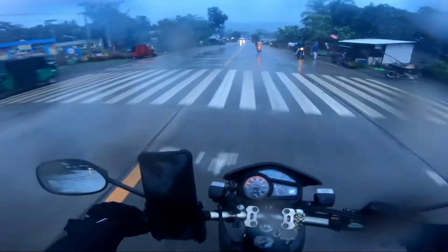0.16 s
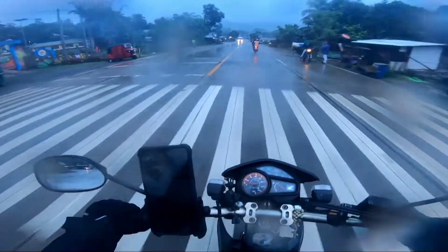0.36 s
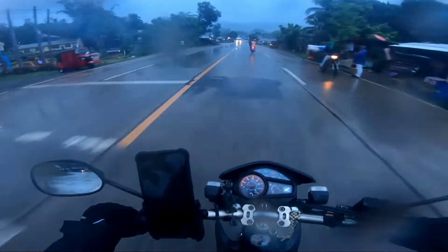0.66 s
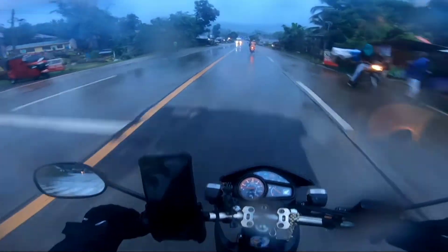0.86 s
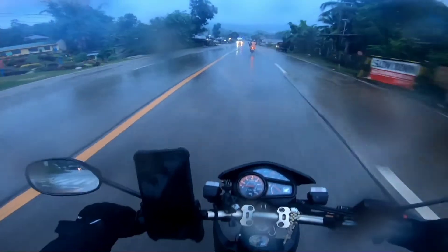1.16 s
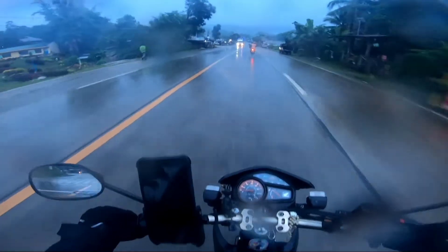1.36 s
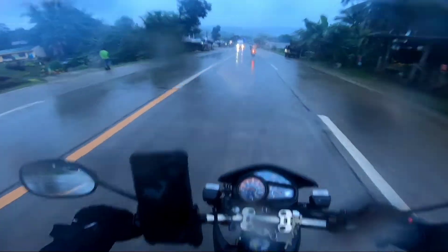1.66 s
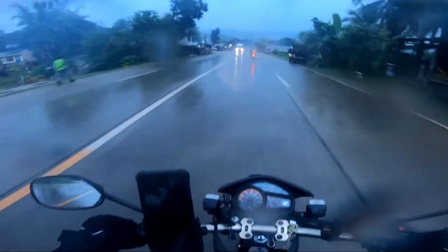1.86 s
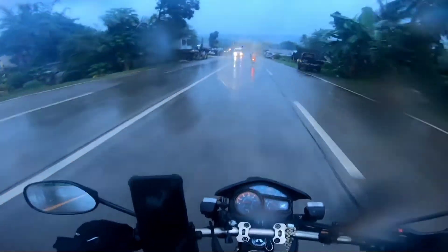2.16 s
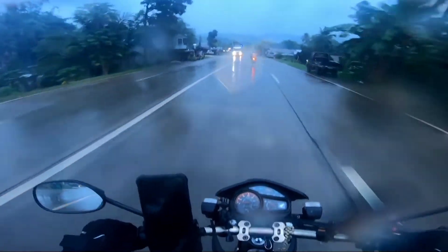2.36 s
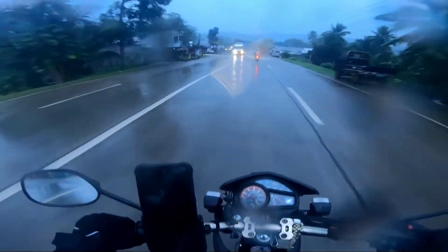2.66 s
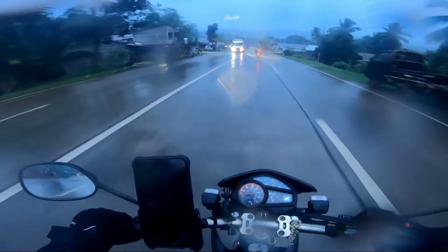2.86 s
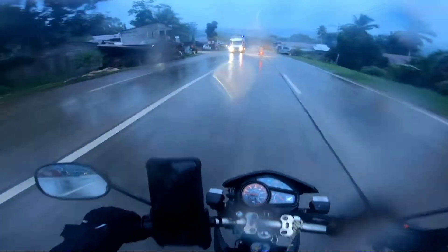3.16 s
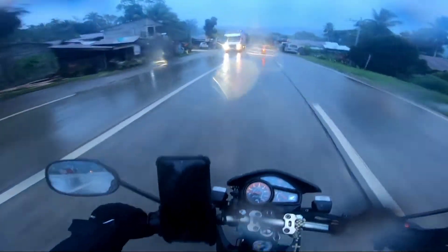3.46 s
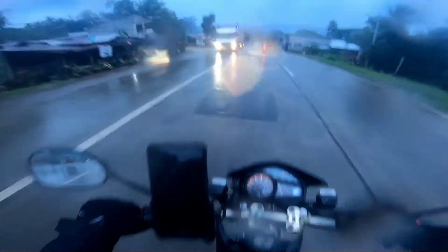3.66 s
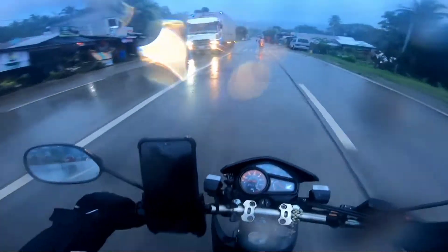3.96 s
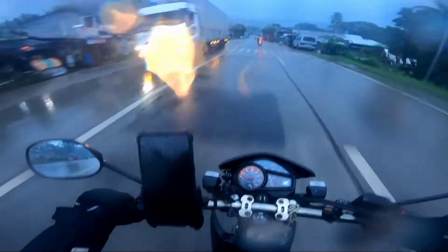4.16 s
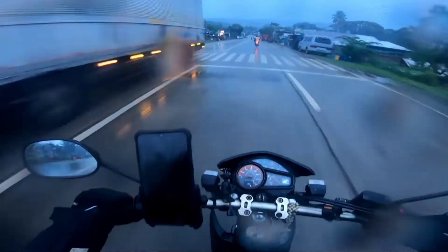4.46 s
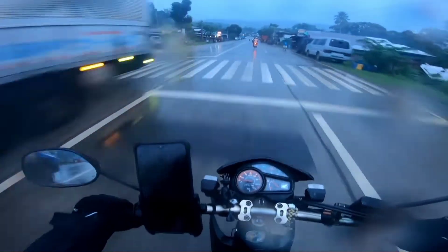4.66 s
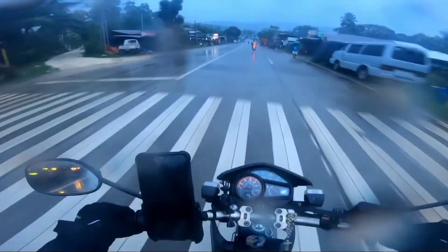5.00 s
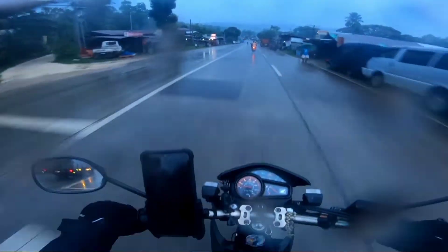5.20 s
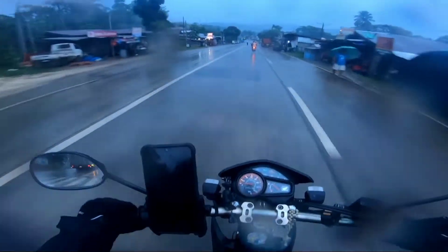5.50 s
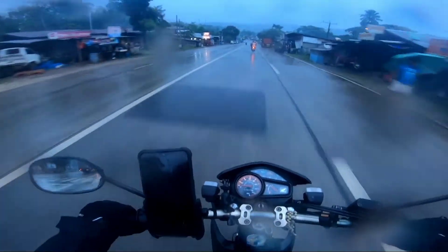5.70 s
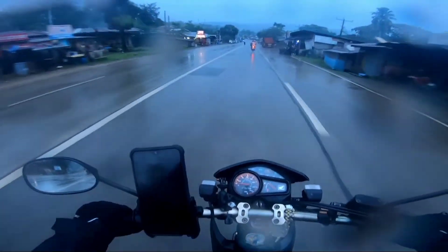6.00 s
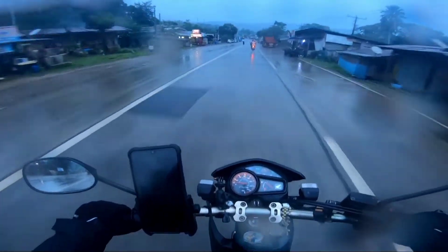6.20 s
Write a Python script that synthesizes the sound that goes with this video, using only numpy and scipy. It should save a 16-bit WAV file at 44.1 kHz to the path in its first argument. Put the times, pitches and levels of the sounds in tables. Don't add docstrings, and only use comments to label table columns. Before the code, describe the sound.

A microphone inside a motorcycle helmet catches a single-cylinder engine throbbing low and rising slightly in pitch. Deep wind buffets, gusty thumps and broad roar surround it, with bright tyre spray, ticking raindrops and small plastic rattles. Hiss thickens on wetter road near the middle, then an oncoming lorry swishes past and the ride continues. Sound sits in the left channel; the right has only very faint hiss.

```python
import sys
import numpy as np
from scipy import signal
from scipy.fft import rfft, irfft
from scipy.io import wavfile
from scipy.ndimage import uniform_filter1d

SR = 44100
rng = np.random.default_rng(int(sys.argv[2]) if len(sys.argv) > 2 else 0)


def transcribe(signal):
    frames = np.atleast_2d(signal).T
    limited = np.clip(frames, -1, 1)
    pcm = np.round(limited * 32767).astype(np.int16)
    wavfile.write(sys.argv[1], SR, pcm)


def invert_db(level):
    return 10 ** (np.asarray(level, dtype=float) / 20)


N = 279594
T = np.arange(N) / SR
F = np.maximum(np.fft.rfftfreq(N, 1 / SR), .1)

# time_s, firing_rate_hz
SPEED = [(0, 33.2), (.7, 34.3), (1.45, 35.45), (2.2, 36.35), (2.95, 37.3), (3.3, 37.7), (3.52, 37.9),
         (3.7, 38.4), (4.0, 38.55), (4.45, 39.15), (5.2, 39.7), (6.34, 40.3)]


def level(x, db):
    return x * invert_db(db) / np.sqrt(np.mean(x ** 2))


def curve(table):
    s, value = np.transpose(table)
    return np.interp(T, s, value)


def walk(rate):
    k = max(int(SR / rate), 2)
    steps = np.repeat(rng.standard_normal(300), k)[:N]
    w = uniform_filter1d(uniform_filter1d(steps, k), k)
    return w / w.std()


def filtered_noise(response):
    return irfft(rfft(rng.standard_normal(N)) * response, N)


def noise(spectrum, shared_db, own_db, rate, count):
    hz, db = np.transpose(spectrum)
    colour = invert_db(np.interp(np.log(F), np.log(hz), db, left=-90, right=-90))
    shaped = rfft(rng.standard_normal(N)) * colour
    place = (count - 1) * np.log(F / hz[0]) / np.log(hz[-1] / hz[0])
    total = np.zeros(N)
    for k in range(count):
        share = np.clip(1 - abs(place - k), 0, 1)
        total += irfft(shaped * share, N) * invert_db(own_db * walk(rate))
    return level(total * invert_db(shared_db * walk(rate)), 0)


def resonance(hz, width):
    return 1 / (1 + 1j * (F - hz ** 2 / F) / width)


def add(out, s, grain):
    i = int(s * SR)
    out[i:i + len(grain)] += grain[:N - i]


def bump(s, half, db):
    return db * np.exp(-((T - s) / half) ** 2)


def swells(table, lull_db):
    power = invert_db(lull_db) ** 2
    for s, db, half in table:
        power = power + invert_db(bump_db := db) ** 2 * np.exp(-2 * ((T - s) / half) ** 2)
    return np.sqrt(power)


def follow(mean_db, per_wind_db, per_firing_hz):
    # time_s, level_db
    airflow = [(0, -34), (.45, -32), (.75, -31.5), (1.05, -35.5), (1.6, -34.5), (2.05, -33), (2.4, -34.5),
               (2.9, -34.5), (3.3, -31.5), (3.75, -38), (4.2, -29), (4.65, -34), (5.2, -30.5), (5.5, -30),
               (5.85, -33.5), (6.34, -30.5)]
    wind_db, rate = curve(airflow), curve(SPEED)
    return mean_db + per_wind_db * (wind_db - wind_db.mean()) + per_firing_hz * (rate - rate.mean())


def engine():
    # time_s, level_db
    throttle = [
        (0, 1.5),
        (.3, -1),
        (1, -5),
        (1.7, -3),
        (2.3, -3.5),
        (3, -1.5),
        (3.5, -3),
        (4, -5.5),
        (5.3, -5),
        (6.34, -7.5),
    ]
    rate = curve(SPEED)
    cycles = np.cumsum(rate) / SR
    chance = rng.standard_normal((300, 2))
    driven = exhaust(cycles, chance) + exhaust_gas(cycles) + chain(cycles) + gear_whine(cycles, rate)
    return invert_db(curve(throttle)) * driven + crank(cycles) + intake(cycles, invert_db(.8 * chance[:, 0]))


def exhaust(cycles, chance):
    # pitch_hz, width_hz, level_db, lag_ms after the firing
    pipe_rings = [(115.7, 74, -1.5, 0.79), (149.5, 55, 0, 13.34), (237.8, 101, 5.5, 5.976),
                  (334.5, 99, -0.5, 18), (443, 51, -4.5, 9.85), (576, 45, -16, 20.5), (830, 13, -12, 3.52),
                  (1015, 140, -25, 15), (1360, 160, -18, 18.5), (1520, 210, -22, 6.6)]
    at = np.flatnonzero(np.diff(np.floor(cycles)) > 0)
    late = (.0001 * SR * chance[:len(at), 0]).astype(int)
    pulses = np.zeros(N)
    pulses[np.clip(at + late, 0, N - 1)] = invert_db(2.0 * chance[:len(at), 1])
    pipe = 0
    for hz, width, db, ms in pipe_rings:
        delay = np.exp(-2j * np.pi * F * ms / 1000)
        pipe = pipe + invert_db(db) * resonance(hz, width) ** 2 * delay
    pipe = pipe * (1 - .65 * resonance(395, 55))
    return level(irfft(rfft(pulses) * pipe, N), -22.2)


def exhaust_gas(cycles):
    return level(np.exp(-(cycles % 1) / .3) * filtered_noise(resonance(1200, 1500) ** 2), -40)


def chain(cycles):
    # multiple of the firing rate, level_db
    chain_tones = [(9.7, -34), (8.5, -40)]
    taut_db = bump(1.85, .6, 5)
    return sum(invert_db(db + taut_db + walk(4.3)) * np.sin(2 * np.pi * k * cycles) for k, db in chain_tones)


def gear_whine(cycles, rate):
    gear_tones = (((22, -35.5), (23, -33)), 826, 24)
    orders, hz, width = gear_tones
    whine = np.zeros(N)
    for k, db in orders:
        tone = np.sin(2 * np.pi * k * cycles + .3 * walk(8))
        whine += invert_db(db + .5 + 1.2 * walk(5)) * tone / (1 + ((k * rate - hz) / width) ** 2)
    comes_s, fades_s = 1.6, 3.95
    return whine / (1 + (T / fades_s) ** 12) / (1 + (comes_s / (T + .1)) ** 8)


def crank(cycles):
    # peak_s, level_db, half_length_s
    presses = [(.1, -12.5, 0.091), (.27, -16.5, 0.087), (.55, -21.5, .1), (.8, -20.5, 0.055),
               (1.2, -23.5, 0.17), (1.5, -26, 0.11), (1.81, -17, 0.035), (2.02, -20, .06),
               (2.43, -24, 0.11), (2.8, -20.5, 0.091), (3.0, -26, .06), (3.2, -21.5, 0.14),
               (3.56, -23, 0.08), (3.72, -28, 0.035), (3.97, -18, 0.095), (4.15, -24, 0.1),
               (4.32, -21.5, .08), (4.58, -25.5, 0.053), (4.82, -21, .05), (5.0, -19.5, 0.082),
               (5.3, -16.5, 0.046), (5.47, -22, 0.045), (6.0, -33, 0.076), (6.24, -27, .07)]
    return swells(presses, lull_db=-27.5) * invert_db(0.53 * walk(6.8)) * np.sin(4 * np.pi * cycles)


def intake(cycles, sizes):
    # time_s, level_db
    bark_level = [(0, -39), (.5, -37), (1.1, -39.5), (1.6, -37.5), (2.05, -34.5), (2.5, -37.5),
                  (3.2, -36.5), (3.7, -41), (4.2, -39), (4.8, -45), (6.34, -48)]
    # pitch_hz, width_hz, level_db
    box_rings = [(835, 70, 0), (1005, 130, 0)]
    gulp_at, gulp_lasts = .6, .2
    since = (cycles - gulp_at) % 1
    size = sizes[np.floor(cycles - gulp_at + 1).astype(int)]
    nearness = np.exp(-(np.minimum(since, 1 - since) / gulp_lasts) ** 2)
    puff = level(nearness * rng.standard_normal(N), 0)
    knock = level(1. * (np.diff(since, prepend=0) < 0), -3)
    box = sum(invert_db(db) * resonance(hz, width) for hz, width, db in box_rings) * resonance(930, 500)
    return invert_db(curve(bark_level)) * level(irfft(rfft(size * (puff + knock)) * box, N), 0)


def buffet():
    # time_s, level_db
    turbulence = [(0, -27), (.2, -14), (.7, -13), (1.2, -15.5), (1.6, -13), (1.85, -16), (2.1, -13.5),
                  (3.1, -14), (3.5, -12), (3.8, -18), (4.1, -13), (4.6, -12.5), (4.8, -20), (5.0, -14),
                  (5.4, -16), (5.65, -12), (6.0, -17), (6.34, -14)]
    # pitch_hz, level_db per Hz
    rumble = [(1.5, -10), (4, 0), (10, -1), (16, -4), (21, -11), (27, -30), (50, -55)]
    return invert_db(curve(turbulence)) * noise(rumble, shared_db=.4, own_db=.6, rate=3, count=3)


def heave():
    # peak_s, level_db, half_length_s
    shoves = [(.15, -21, .06), (.33, -15, 0.14), (.58, -17, 0.07), (.85, -17, 0.047), (1.25, -19, .05),
              (1.44, -16, 0.084), (1.75, -14, .04), (1.93, -21, 0.074), (2.1, -10, 0.034),
              (2.34, -14, 0.064), (2.48, -11.5, 0.059), (2.76, -22, 0.048), (2.95, -17, 0.1),
              (3.2, -20, .06), (3.35, -10, 0.067), (3.58, -23, 0.055), (3.76, -19, .05), (3.92, -15, 0.046),
              (4.1, -32, .05), (4.26, -11, 0.058), (4.45, -18, 0.075), (4.88, -17, 0.057),
              (5.06, -8, 0.045), (5.24, -15, 0.071), (5.45, -30, .08), (5.77, -15.5, 0.045),
              (5.93, -13, 0.047), (6.1, -15, 0.037), (6.25, -9.5, 0.082)]
    sway = signal.hilbert(filtered_noise(resonance(28.35, 15.7) ** 2))
    steady = np.real(sway / (abs(sway) + 0.14 * abs(sway).mean()))
    return swells(shoves, lull_db=-27) * steady


def thump():
    # peak_s, level_db, fall_s
    gusts = [(.09, -16.5, 0.27), (.33, -28, .04), (.46, -27, 0.08), (0.689, -24, 0.15), (1.1, -25.5, 0.077),
             (1.24, -24, 0.54), (1.55, -24, 0.24), (1.77, -23, 0.29), (2.03, -20, 0.037), (2.42, -27, 0.15),
             (2.61, -17.5, 0.03), (2.75, -13.5, 0.051), (2.98, -24, 0.35), (3.18, -24, 0.44),
             (3.65, -15.5, 0.051), (3.94, -18, 0.11), (4.15, -21, 0.27), (4.28, -24, 0.31),
             (4.9, -22, 0.19), (5.08, -15.5, 0.088), (5.27, -33, 0.035), (5.42, -18, 0.13),
             (5.54, -20, 0.029), (5.72, -37, 0.059), (5.95, -21.5, 0.2), (6.18, -20, 0.16), (6.32, -20, .1)]
    # pitch_hz, level_db per Hz
    thump_colour = [(14, -10), (22, -16.5), (31, -13.5), (48, -11.5), (75, -11), (105, -12.5), (140, -19),
                    (220, -19.5), (400, -71)]
    rise_s, lull_db = 0.031, -27
    power = invert_db(lull_db) ** 2
    for s, db, fall in gusts:
        shape = np.exp(-np.where(T < s, ((T - s) / rise_s) ** 2, (T - s) / fall))
        power = power + (invert_db(db) * shape) ** 2
    gain = np.sqrt(power) * invert_db(-0.25)
    return gain * noise(thump_colour, shared_db=1.0, own_db=1.5, rate=10, count=4)


def roar():
    # pitch_hz, level_db per Hz
    roar_colour = [(70, -19), (130, 4.5), (200, -2), (300, 3.5), (450, -3), (650, -14.5), (1000, -26)]
    slack_db = bump(4.13, .09, -4)
    gain = invert_db(follow(mean_db=-27, per_wind_db=0.92, per_firing_hz=-0.4) + slack_db)
    return gain * noise(roar_colour, shared_db=0.26, own_db=-0.5, rate=6.3, count=5)


def rush():
    # pitch_hz, level_db per Hz
    rush_colour = [(400, 5), (700, -7), (950, -0.5), (1200, -5.5), (1800, -3), (2400, -11.5), (3400, -27),
                   (5000, -29), (8000, -96)]
    stripes_db = bump(.2, .35, 1.5)
    gain = invert_db(follow(mean_db=-34.5, per_wind_db=0.79, per_firing_hz=-0.013) + stripes_db)
    return gain * noise(rush_colour, shared_db=0.0, own_db=1.5, rate=10, count=16)


def spray():
    # pitch_hz, level_db per Hz
    spray_colour = [(2000, -2), (3200, 6.5), (4600, -1), (6500, -2.5), (9000, -1), (11000, 0), (14000, -4),
                    (17000, -5)]
    puddles_db = bump(2.82, 0.84, 2.5)
    gain = invert_db(follow(mean_db=-44.5, per_wind_db=0.36, per_firing_hz=0.21) + puddles_db)
    return gain * noise(spray_colour, shared_db=.9, own_db=1.1, rate=22, count=16)


def drop(hz, low_db, decay_s, chance):
    t = np.arange(len(chance)) / SR
    splat = .75 * np.sin(2 * np.pi * hz * t) + 1.1 * chance
    tick = invert_db(low_db) * np.sin(2 * np.pi * 3600 * t)
    return 2 * t / decay_s * np.exp(-t / decay_s) * (splat + tick)


def rain():
    # start_s, level_db, pitch_hz
    large_drops = [(0.2772, -34, 10000), (0.556, -32, 12700), (0.6189, -38, 5730), (0.8794, -34, 12600),
                   (1.029, -37, 9000), (1.44, -35, 11200), (1.509, -33, 9960), (1.7957, -34, 10400),
                   (1.9215, -36, 10900), (2.1934, -33, 11500), (2.2115, -33, 10500), (2.233, -37, 12000),
                   (2.333, -37, 10600), (2.3156, -31, 10760), (2.445, -32, 6540), (2.8044, -40, 9700),
                   (3.2315, -36, 6440), (3.5597, -38, 9300), (3.82, -33.5, 6930), (3.9762, -40, 9700),
                   (3.983, -28, 10600), (3.984, -37, 5000), (4.0775, -38, 6410), (4.1179, -36, 8500),
                   (5.3077, -35, 6000), (5.397, -34, 6300), (5.4794, -32, 12200), (5.586, -36, 10300),
                   (5.906, -34, 12400), (6.0124, -35, 5470), (6.0194, -31.5, 9500), (6.0434, -36, 11500),
                   (6.1469, -33.5, 10700), (0.9767, -42, 9000), (3.5907, -36, 10000), (4.306, -35, 6000),
                   (4.405, -34, 8300), (4.435, -32, 10400), (4.71, -35, 8950), (0.0697, -43, 4900),
                   (0.5352, -37, 5200), (0.7906, -52, 6000), (1.1932, -35, 11500), (1.7878, -43, 5000),
                   (3.6287, -37, 5030), (6.1809, -37, 13000)]
    out = np.zeros(N)
    for s, db, hz in large_drops:
        add(out, s, invert_db(min(db, -29)) * drop(hz, -6, .0011, rng.standard_normal(400)))
    for when, pitch, size in rng.random((900, 3)):
        small = drop(5000 * 2.9 ** pitch, -8, .00025, rng.standard_normal(200))
        add(out, when * T[-1], invert_db(-46 + 11.5 * size ** 3) * small)
    return out


def lorry():
    abreast_s, half_s, spray_db = 4.58, 0.37, -41.5
    cloud = level(filtered_noise(resonance(7200, 13000)) * invert_db(1.5 * walk(45)), spray_db)
    engine_burst = level(filtered_noise(resonance(1680, 200)), -39)
    return engine_burst * np.exp(-((T - 4.6) / .05) ** 2) + cloud * np.exp(-abs((T - abreast_s) / half_s) ** 3)


def panels():
    # pitch_hz, level_db
    panel_rings = [(850, -33), (1030, -36.5), (1340, -30), (1650, -38), (2700, -41), (3420, -39.5),
                   (4660, -42), (7500, -49), (9750, -46), (11000, -47), (12600, -50)]
    out, t = np.zeros(N), np.arange(SR // 16) / SR
    for hz, db in panel_rings:
        for when, pitch, size in rng.random((190, 3)):
            detune = 1 + .05 * (pitch - .5) + 0.0403 * (size - .5) * np.sin(40 * when)
            ring = np.sin(2 * np.pi * hz * detune * t) * t / 0.0027 * np.exp(-t / 0.009)
            add(out, when * T[-1], invert_db(db + 9.2 * (size - 2)) * ring)
    return out


def tab():
    tab_pitches = (8933, 13776)
    tab_fades = (.14, .085)
    # start_s, level_db, number of knocks one firing apart
    tab_knocks = [
        [(1.1937, -60, 1), (1.5883, -57, 1), (3.4206, -52, 1), (3.5644, -52, 1), (4.4323, -62, 1), (5.4459, -59, 1), (5.6844, -56, 1), (5.7937, -57, 1), (6.106, -52, 1), (6.2397, -57, 1)],
        [(1.3034, -54, 3), (1.4396, -57, 1), (1.5604, -53, 4), (1.79, -59, 1), (1.83, -60, 1), (1.89, -59, 2), (2.8639, -52, 1), (3.3692, -55, 1), (3.4396, -53, 1), (4.665, -60, 1), (5.1088, -58, 1), (5.1627, -59, 1), (5.2974, -60, 1), (5.4194, -60, 1), (5.6196, -60, 1), (5.7124, -59, 1), (5.9838, -60, 3), (6.1055, -51, 1), (6.2544, -61, 1)],
    ]
    out, t = np.zeros(N), np.arange(SR // 4) / SR
    for hz, t60, knocks in zip(tab_pitches, tab_fades, tab_knocks):
        fade_db = -30 * t / t60 - 6 * (t / (.3 * t60)) ** 4
        for s, db, count in knocks:
            ring = invert_db(db + 10.0 + fade_db) * np.sin(2 * np.pi * hz * t)
            for k in range(count):
                add(out, s + k / np.interp(s, *np.transpose(SPEED)), ring)
        out += level(filtered_noise(resonance(hz, 25)) * invert_db(4 * walk(12)), -69)
    return out


def right_hiss():
    # pitch_hz, level_db per Hz
    hiss_colour = [(15, -3), (50, -5), (120, -8), (400, -6), (1000, -10), (2000, -13), (3500, -20),
                   (6000, -40)]
    gain = invert_db(follow(mean_db=-78.3, per_wind_db=1.1, per_firing_hz=-.5))
    return gain * noise(hiss_colour, shared_db=.3, own_db=.4, rate=8, count=4)


def scene():
    # pitch_hz, width_hz, lift_db
    shell_rings = [(444, 23, 3.5), (866, 57, 3.5), (1010, 140, 1.5), (1480, 160, 1.5), (2374, 145, -6),
                   (2790, 160, 2.5), (3007, 95, 5), (3080, 120, -3.5), (3420, 140, 1), (3590, 44, 4),
                   (3790, 89, -9), (4660, 1230, 4), (8500, 220, 1.5), (10100, 350, -0.5), (10900, 410, 0)]
    shell = np.prod([1 + (invert_db(db) - 1) * resonance(hz, width) for hz, width, db in shell_rings], axis=0)
    outside = buffet() + heave() + thump() + roar() + rush() + spray() + rain() + lorry()
    inside = irfft(rfft(outside) * shell, N) + engine() + panels() + tab()
    return np.array([inside, np.zeros(N)])


def band_limit(x):
    return signal.sosfilt(signal.butter(12, 15620, fs=SR, output="sos"), x)


def record(dry):
    live = np.tanh(.85 * dry[0]) / .85
    live = irfft(rfft(live) * (F < 15600), N)
    edge = irfft(rfft(live) * (F > 15250), N)
    live = live - edge * np.clip(4 * (walk(36) - .7), 0, 1)
    return band_limit(np.array([live, right_hiss()]))


dry = scene()
out = record(dry)
transcribe(out)
```